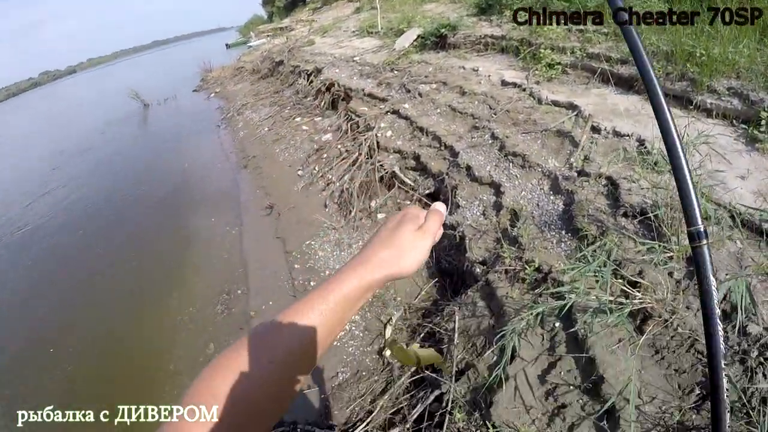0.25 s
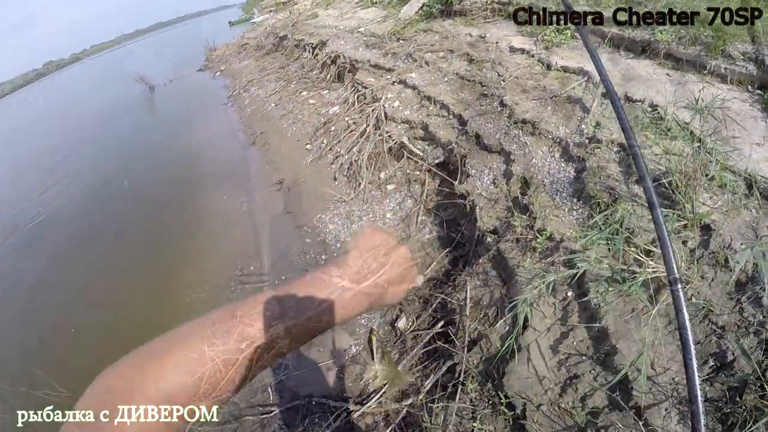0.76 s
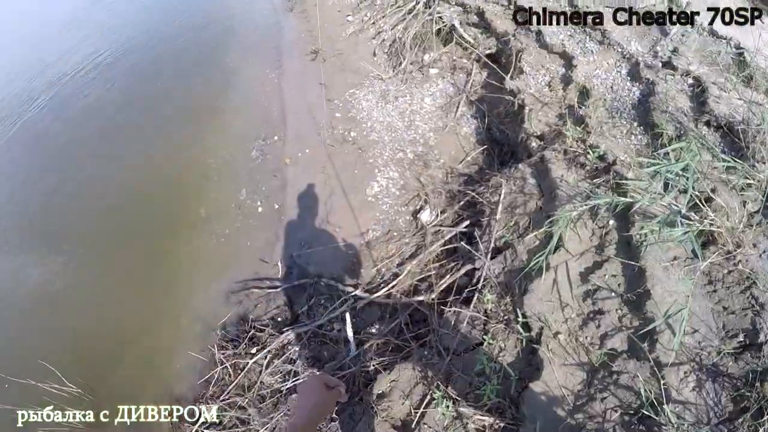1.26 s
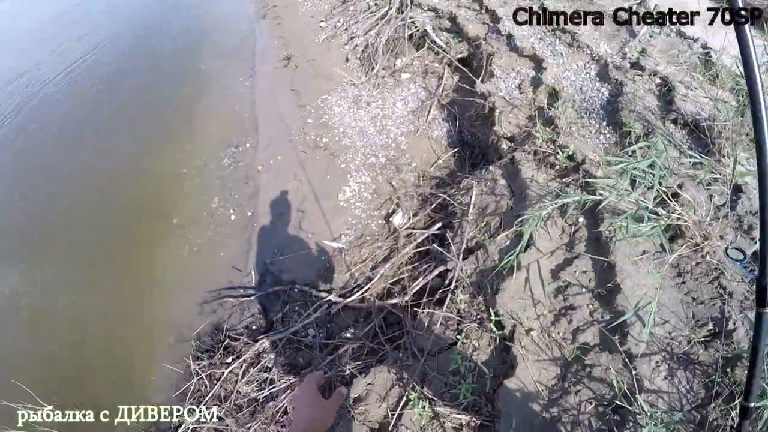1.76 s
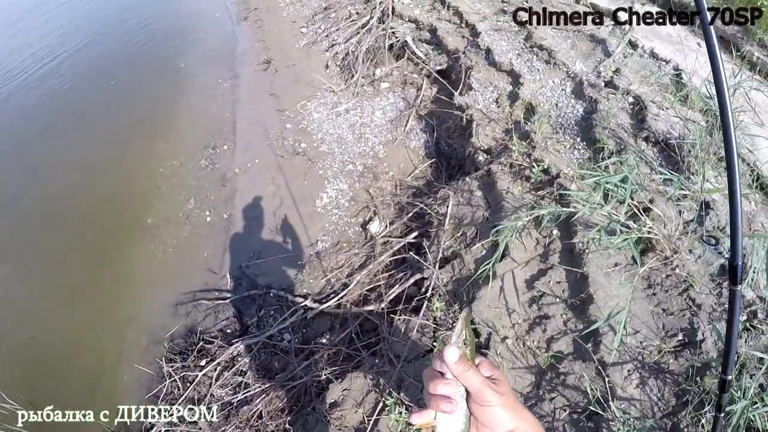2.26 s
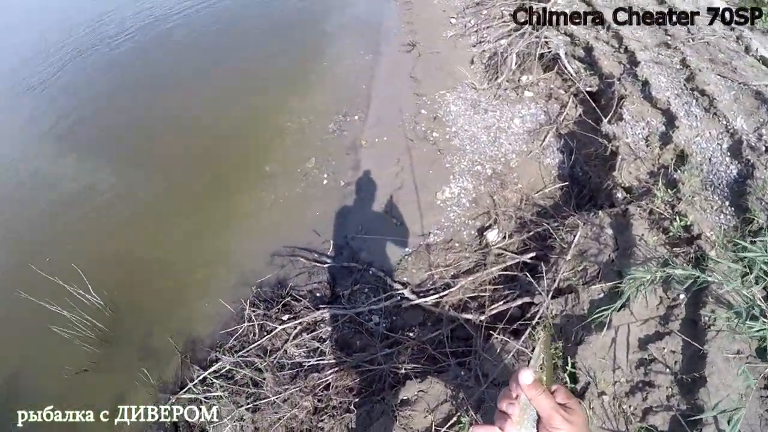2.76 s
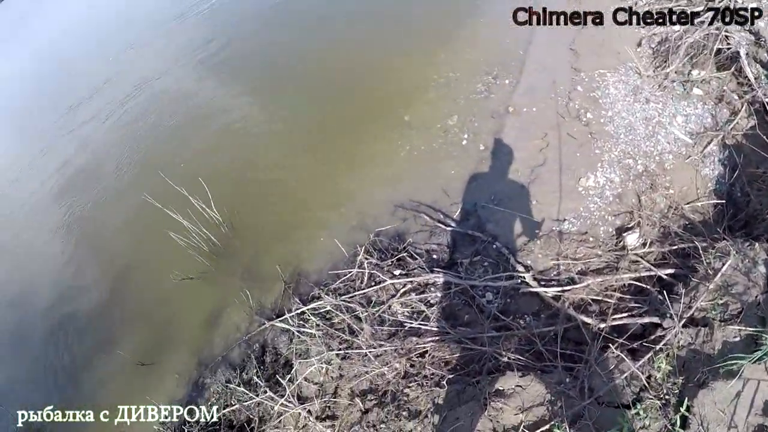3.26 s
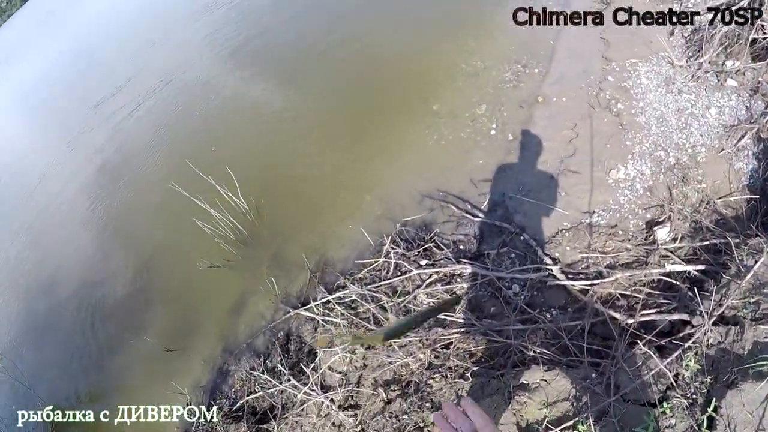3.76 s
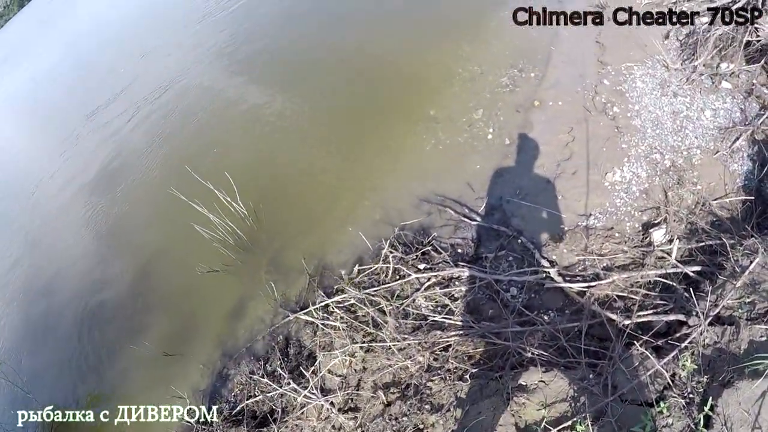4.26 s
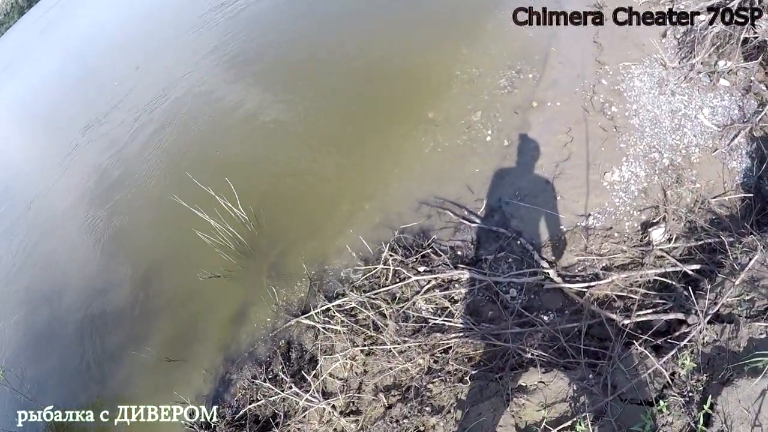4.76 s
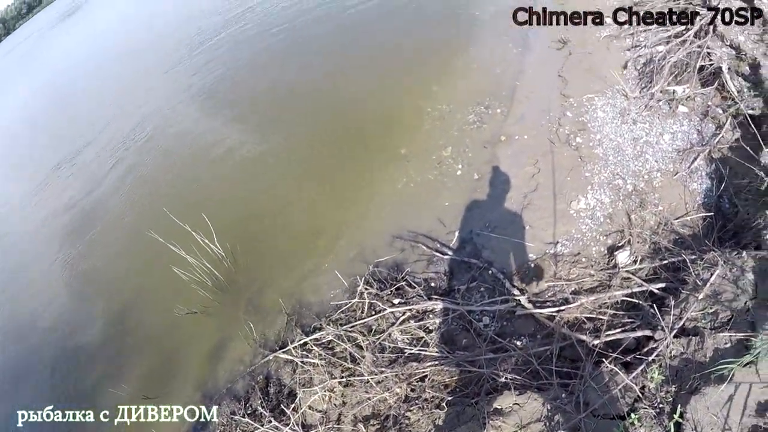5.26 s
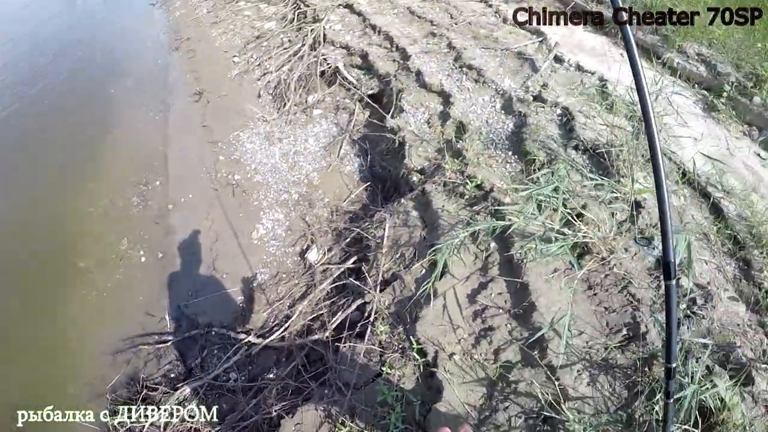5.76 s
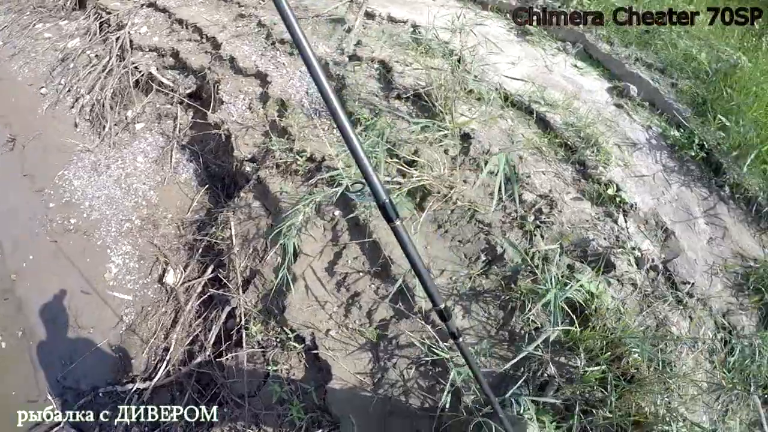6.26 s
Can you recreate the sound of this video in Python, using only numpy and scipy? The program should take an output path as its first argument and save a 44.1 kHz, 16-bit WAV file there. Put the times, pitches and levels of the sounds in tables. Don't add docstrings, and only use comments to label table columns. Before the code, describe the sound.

Brief wet slaps and hard clicks open a breezy riverbank, followed by overlapping cricket buzzes, a light fish splash with droplets, and soft knocks.

```python
import sys
import numpy as np
from scipy import signal
from scipy.fft import rfft, irfft, next_fast_len
from scipy.io import wavfile

SR = 44100
rng = np.random.default_rng(int(sys.argv[2]) if len(sys.argv) > 2 else 0)


def invert_db(level):
    return 10 ** (np.asarray(level, dtype=float) / 20)


def dump(signal):
    limited = np.clip(np.atleast_2d(signal).T, -1, 1)
    pcm = np.round(limited * 32767).astype(np.int16)
    wavfile.write(sys.argv[1], SR, pcm)


N = 286684


def in_time(rows):
    s, *columns = np.transpose(rows)
    return [np.interp(np.arange(N) / SR, s, c) for c in columns]


def rms_one(x):
    return x / np.sqrt(np.mean(x ** 2) + 1e-20)


def drift(rate_hz):
    r = np.exp(-40 * np.pi * rate_hz / SR)
    noise = rng.standard_normal(N // 20 + 2002)
    slow = signal.lfilter([1], [1, -2 * r, r * r], noise)[2000:]
    return np.interp(np.arange(N) / 20, np.arange(len(slow)), rms_one(slow))


def coloured(x, spectrum):
    hz, level_db = np.transpose(spectrum)
    size = next_fast_len(N)
    log_hz = np.log(np.arange(size // 2 + 1) * SR / size + 1e-3)
    gain = invert_db(np.interp(log_hz, np.log(hz), level_db))
    return rms_one(irfft(rfft(x, size) * gain, size)[:N])


def butter_sos(order, hz, kind):
    return signal.butter(order, hz, kind, fs=SR, output="sos")


def pings(events, attack, decay, rise, blunt):
    out = np.zeros(N + SR)
    for (s, peak_db, hz, ms), turn in zip(events, rng.random((len(events), 1))):
        u = np.arange(int(SR * ms / 200) + 8) / (SR * ms / 1000)
        fall = np.exp(-decay * np.maximum(u - attack, 0) ** blunt)
        shape = np.minimum(u / attack, 1) * fall
        pitch_hz = np.minimum(hz * (1 + rise * (u - .5)), .45 * SR)
        cycles = np.cumsum(pitch_hz) / SR + turn
        at = round(s * SR)
        out[at:at + len(u)] += invert_db(peak_db) * shape * np.sin(2 * np.pi * cycles)
    return out[:N]


def ringing(events, cycles):
    return [(s, db, hz, 1000 * cycles / hz) for s, db, hz in events]


# time in seconds, rumble in dB.
GUSTS = [(0.0, -43.5), (0.14, -39), (0.31, -45), (1.38, -45.5), (1.8, -48.5), (2.55, -44.5), (2.62, -39),
         (3.11, -45), (3.82, -48), (4.11, -44), (4.16, -48.5), (4.47, -46.5), (5.0, -47.5), (5.29, -44.5),
         (5.43, -43), (5.77, -46), (6.5, -44.5)]
# frequency in Hz, density in dB per Hz.
RUMBLE_COLOUR = [(8.8, -48), (15, 0.5), (36, -1.5), (97, -9.5), (124, -15.5), (151, -19.5), (308, -29),
                 (400, -47), (520, -61), (880, -120)]
# time in seconds, level in dB.
BREEZE_LEVEL = [(0, -53), (2.6, -53.5), (3.1, -54.5), (4.15, -54.5), (4.47, -53.5), (5.25, -54), (5.5, -52),
                (6.5, -52.5)]
# frequency in Hz, density in dB per Hz.
AIR_COLOUR = [(88, -41), (150, -1.5), (179, -6), (553, -10), (659, -10), (755, -10.5), (848, -12),
              (3450, -16.5), (4530, -16), (5500, -19.5), (9130, -35.5), (10300, -27.5), (15700, -61)]


def wind():
    rustle_db, rustle_s = 8.5, 0.085
    air_db = in_time(BREEZE_LEVEL)[0] + rustle_db * np.exp(-np.arange(N) / SR / rustle_s)
    rumble_db = in_time(GUSTS)[0] + 2.0 + 0.39 * drift(17)
    rumble = coloured(rng.standard_normal(N), RUMBLE_COLOUR) * invert_db(rumble_db)
    air = coloured(rng.standard_normal(N), AIR_COLOUR) * invert_db(air_db + 3.0 + .5 * drift(40))
    leaves = signal.sosfilt(butter_sos(2, 1490, "high"), air)
    brighter = invert_db(air_db - np.median(air_db)) - 1
    return rumble + air + leaves * brighter


# time in seconds, level in dB.
MOTOR_LEVEL = [(0, -65.5), (1.0, -52.5), (1.6, -52.5), (3.2, -53), (4.5, -54.5), (6.5, -60.5)]


def motor():
    hum_hz, width_hz = 123.1, 11
    band = butter_sos(1, [hum_hz - width_hz / 2, hum_hz + width_hz / 2], "band")
    hum = rms_one(signal.sosfilt(band, rng.standard_normal(N)))
    return invert_db(in_time(MOTOR_LEVEL)[0]) * hum


# frequency in Hz, density in dB per Hz.
CHORUS_COLOUR = [(6500, -11), (8500, 0), (10500, -11), (12500, -7.5), (14500, -10), (15900, 1.5)]


def chorus():
    return invert_db(-60 + 2.5 * drift(2.1)) * coloured(rng.standard_normal(N), CHORUS_COLOUR)


# start in seconds, peak in dB, pitch in Hz, overtone in dB above it.
LURE_CLACKS = [(.0014, -20, 5900, -16), (.0058, -24, 8860, -5), (.008, -23, 6000, -20),
               (0.012, -26, 6100, 0), (.017, -18, 6540, -17), (0.02, -27, 5420, -20),
               (0.022, -27, 7280, -20), (0.025, -18, 6880, -20), (0.0275, -22, 8830, -20),
               (0.03, -34, 5200, 11), (.0316, -22, 8080, -20), (.0346, -26, 6800, 4),
               (0.043, -30, 8150, -20), (0.049, -29, 7380, -20), (0.0527, -17, 6900, -2),
               (0.1181, -17.5, 5650, 2), (0.145, -22, 5870, 6.5), (0.1656, -15.5, 5400, -7),
               (.1673, -32, 5800, -9), (0.171, -18, 13060, -25), (.1759, -34, 6960, -22),
               (0.2386, -23, 5700, -6), (0.241, -29, 5730, -20), (0.242, -22, 13700, -20),
               (0.2455, -18.5, 5630, -2), (0.2474, -22.5, 5240, -1), (0.266, -24, 12500, -22),
               (.3285, -31, 8560, -13)]
# start in seconds, peak in dB.
BEAD_TICKS = [(.3213, -34), (.3534, -38.5), (.3718, -43), (.392, -35), (0.4066, -40), (0.441, -34),
              (.4814, -44), (.5022, -38)]


def lure():
    cycles, overtone = 3.4, 1.9
    tick_hz, tick_ms, sag_hz_per_s = 6900, 1.5, 2200
    clacks = ringing([(s, db, hz) for s, db, hz, _ in LURE_CLACKS], cycles)
    clacks += ringing([(s, db + up_db, overtone * hz) for s, db, hz, up_db in LURE_CLACKS], cycles)
    first_s = BEAD_TICKS[0][0]
    ticks = [(s, db, tick_hz - sag_hz_per_s * (s - first_s), tick_ms) for s, db in BEAD_TICKS]
    return clacks + ticks


# frequency in Hz, density in dB per Hz.
SPRAY_SPECTRA = [
    [(470, -56), (800, -9.5), (1250, -9), (1950, -17.5), (2730, -4), (4430, -10), (5610, -5), (14200, -14),
     (15500, -21)],
    [(1000, -4), (1700, -3), (2220, -7), (2630, -2), (4620, -11.5), (5160, -6), (9070, -18.5), (9940, -18),
     (15500, -44)],
]


def spray(events, thrower, level_db, per_s, spread_db, short_s, long_s, long_db, cycles):
    blows = np.zeros(N)
    starts = [round(row[0] * SR) for row in events]
    np.add.at(blows, starts, invert_db(np.array(events)[:, 1]) ** 2)
    burst, patter = [signal.lfilter([1], [1, -np.exp(-1 / (tau * SR))], blows + 1e-18)
                     for tau in (short_s, long_s)]
    sizes = invert_db(spread_db * np.minimum(rng.exponential(1, N), 4)) * rng.choice([-1, 1], N)
    born = rng.random(N) < per_s * invert_db(5.0 * drift(150)) / SR
    pitch_class = rng.integers(0, 16, N)
    rings = 0
    for k, hz in enumerate(np.linspace(30, 120, 16) ** 2):
        r = np.exp(-hz / cycles / SR)
        resonance = [1, -2 * r * np.cos(2 * np.pi * hz / SR), r * r]
        hits = sizes * born * (pitch_class == k) + 1e-18
        rings = rings + rms_one(signal.lfilter([1, 0, -1], resonance, hits)) * hz ** .25
    density = np.sqrt(burst + invert_db(long_db) ** 2 * patter)
    return invert_db(level_db) * density * coloured(rings, SPRAY_SPECTRA[thrower])


# start in seconds, peak in dB, pitch in Hz, length in ms.
SLAPS = [(0.019, -31, 3050, 1.7), (0.0223, -17, 3560, 0.72), (.064, -35, 4200, 1), (0.083, -24, 6660, 0.51),
         (0.0986, -22, 4800, 0.37), (0.1114, -19.5, 2750, 1.2), (0.1165, -35, 3200, 3.5),
         (0.1241, -23.5, 2650, 3.3), (.1248, -28, 5530, 2.3), (0.1381, -21.5, 5600, 0.99),
         (0.1601, -19, 2500, 1), (.162, -33.5, 1430, 5.8), (0.164, -16.5, 3220, 0.75),
         (0.1422, -24, 3800, 0.97), (0.188, -25, 6960, 0.98), (0.196, -32, 6500, 1.6),
         (0.202, -36, 7500, .5), (0.22, -31, 3380, 1.1), (.272, -36, 3550, 3.8), (.2797, -31, 5500, .7),
         (.3045, -43, 3620, 2)]


def fish():
    rattle = lure()
    out = invert_db(6.0) * pings(rattle, attack=0.14, decay=2.2, rise=0.034, blunt=0.84)
    out += invert_db(5.5) * pings(SLAPS, attack=0.34, decay=2.6, rise=0.034, blunt=0.93)
    out += spray(rattle + SLAPS, 0, level_db=-12.5, per_s=3000, spread_db=1.5,
                 short_s=0.0021, long_s=0.02, long_db=-11.0, cycles=1.5)
    return out


# start in seconds, peak in dB, pitch in Hz.
DRY_SNAPS = [(.0037, -20, 7000), (.0059, -11, 7100), (0.0141, -9, 7500), (.0172, -10, 6000),
             (0.0295, -18, 8000), (0.028, -12, 8000), (0.031, -13, 8000), (0.0443, -13, 8000),
             (.0489, -20, 8000), (0.052, -23, 6000), (.1456, -11, 6000), (0.248, -17, 4500),
             (0.242, -25, 4500), (.0875, -17, 7000), (.1023, -27, 5000), (.119, -26, 8000),
             (0.15, -25, 6000), (.1812, -25, 6000), (0.194, -25, 7000), (.1966, -22, 7000),
             (.2021, -22, 7000), (.211, -29, 6000), (.2165, -30, 5500), (0.224, -22, 8000),
             (0.2447, -18, 7000), (.2552, -27, 6000), (0.2682, -21, 8000), (.2847, -38, 6000),
             (.2906, -33, 6000), (0.299, -19, 8000), (.3046, -24, 7000), (4.259, -22, 5000),
             (4.2885, -38, 10000), (4.2965, -41, 6500), (4.3124, -35, 9000), (4.382, -40, 9000),
             (4.4285, -33, 11000), (4.464, -41, 10000), (4.7538, -26, 7000)]


def snaps():
    return invert_db(1.5) * pings(ringing(DRY_SNAPS, 1.04), attack=0.55, decay=4.5, rise=.01, blunt=0.93)


def cricket(phrase, rates, singer, wing, perch, swell, colour, rings, core):
    rasp = 0.17
    start, end, offset = phrase
    glide_1, glide_2, stroke_ms, late_ms = singer
    first_hz, third_hz = wing
    echo_db, echo_ms, scatter_db, scrape_db = perch
    full_db, open_db, after_s, width_s, sag_db = swell
    wing_hz, sharper, second_db, soft_db, third_db = colour
    long_1, long_2, long_3, climb = rings

    t = np.arange(round(start * SR), min(round(end * SR), N)) / SR
    rate = np.interp(t, [start, (start + end) / 2, end], rates)
    strokes = (np.cumsum(rate) - rate.sum()) / SR - offset
    since = strokes % 1 / rate
    u = since * 1000 / stroke_ms
    index = (np.floor(strokes) - np.floor(strokes[0])).astype(int)
    chance = rng.standard_normal((80, 9))[index].T

    swelling = t - start - after_s
    soft = 1 / (1 + np.exp(swelling / width_s))
    level_db = full_db - open_db * soft - sag_db * np.maximum(swelling, 0)
    level_db = level_db - 10 * np.exp((start - t) / 0.057)
    effort = invert_db(0.45 * (level_db - level_db.max()))
    hz = wing_hz * (1 + sharper * soft + climb * swelling)
    mean_hz = np.sqrt(hz * hz[-1])

    lag_s = np.arange(int(.06 * SR)) / SR
    leaves = rng.standard_normal((3, len(lag_s))) * np.exp(-lag_s / 0.022)
    leaves = invert_db(scatter_db) * leaves * np.sqrt(2 / 0.019 / SR)

    partials = [
        (first_hz / mean_hz, glide_1, 0, 0, long_1, 0.05, -7),
        (2, glide_2, second_db + soft_db * soft, 0, long_2, 0.12, .0),
        (third_hz / mean_hz, .02, third_db + 3 * soft, late_ms / stroke_ms, long_3, .1, -1)]
    heard = 0
    for k, (ratio, glide, above_db, late, long, rise, dull_db) in enumerate(partials):
        v = np.maximum(u - late, 0)
        shape = rms_one((1 - np.exp(-v / rise)) * np.exp(-(v / long) ** 3))
        step = np.log(np.cosh(6 * (u / long - .55))) * long * stroke_ms / 12000
        cycles = ratio * hz * (since + glide * effort * (step + (k == 0) * since / 2))
        jitter = rasp * ratio * chance[3 + k]
        tone = np.sqrt(2) * np.sin(2 * np.pi * (cycles + jitter))
        if k == 1:
            teeth = signal.sosfilt(butter_sos(2, 1290, "low"), rng.standard_normal(len(t)))
            tone = tone * (1 + invert_db(scrape_db) * rms_one(teeth))
        tone = shape * tone
        if k < 2:
            ring_hz = core[2 * k] * (hz / hz[-1]) ** ((k + 1) / 2)
            fade = rms_one((1 - np.exp(-since / 0.0017)) * np.exp(-since / 0.0045))
            ring = np.sqrt(2) * np.sin(2 * np.pi * (ring_hz * since + jitter))
            tone = tone + invert_db(core[2 * k + 1]) * fade * ring
        tone = invert_db(level_db - 2.5 + above_db + 0.53 * chance[k]) * tone
        path = np.zeros(len(lag_s))
        path[0] = 1
        path[round(echo_ms * SR / 1000)] = invert_db(echo_db + dull_db)
        swaying = signal.fftconvolve(chance[6:] * tone, invert_db(dull_db) * leaves, axes=1)
        heard = heard + signal.fftconvolve(tone, path) + swaying.sum(axis=0)
    out = np.zeros(N + SR)
    out[round(start * SR):][:len(heard)] = heard
    return out[:N]


# start in seconds, end in seconds, stroke offset 0-1.
SONGS = [(0.34, 0.862, 0.875), (0.9, 1.5, 0.9), (0.86, 1.53, 0.875), (1.56, 2.29, 0.725),
         (2.3, 3.03, 0.925), (2.9, 3.355, 0.175), (3.3, 4.11, 0.4), (4.69, 5.53, 0.575),
         (5.25, 6.075, 0.075), (6.17, 6.5, 0.775)]
STROKE_RATES = [(73.0, 71.2, 67.4), (66.2, 66.4, 70.6), (72.8, 70.45, 68.3), (60.6, 65.1, 62.1),
                (65.5, 67.6, 65.1), (63.8, 72.3, 66.4), (73.7, 76.6, 73.6), (71.2, 71.2, 69.6),
                (62.7, 65.3, 61.0), (61.7, 65.9, 67.3)]
# glide share of 1st partial, of 2nd, stroke in ms, lateness of 3rd in ms.
STROKES = [(0.19, 0.14, 3, 2.0), (0.056, 0.13, 2.6, .3), (0.12, 0.17, 4.7, 1.0), (0.11, 0.067, 3.1, .3),
           (0.05, 0.1, 3, 0.27), (0.043, 0.077, 3.1, 2.2), (0.17, 0.096, 4.6, 2.6), (0.022, 0.19, 5.1, .5),
           (0.03, 0.079, 3.5, .3), (0.045, 0.054, 5.5, .3)]
# 1st in Hz, 3rd in Hz.
RESONANCES = [(5000, 13400), (4560, 14000), (4850, 13300), (4620, 14000), (4720, 13750), (4870, 12750),
              (4420, 13330), (4780, 14300), (4680, 13800), (4650, 14000)]
# ground echo in dB, echo delay in ms, leaf scatter in dB, dry scrape in dB.
PLACES = [(-5, 5.8, -7, -3.5), (-13, 13, -1, 2.5), (-12, 23, 0.5, 1), (-13, 2.5, -7.5, -10),
          (-10.5, 7, -7.5, -4), (-10, 7.8, -7, -1.5), (-9, 4.6, -10, -7.5), (-4, 5.6, -3.5, -0.7),
          (-25, 5.2, -8.5, -7), (-30, 15, -6, -2)]
# full level in dB, opening in dB below it, swell time in seconds,
# swell width in seconds, sag in dB per second.
SWELLS = [(-52.5, 20, 0.078, 0.023, 4.5), (-55, 3, 0.099, 0.042, 9.5), (-56, 6.5, .07, 0.028, 14),
          (-48.5, 18.5, .31, 0.068, 4), (-48, 11, 0.28, 0.065, 8.5), (-54.5, 7, 0.065, 0.054, 4),
          (-48, 9.5, 0.34, 0.024, -0.5), (-55, 15, 0.26, 0.072, 7.5), (-48.5, 17.5, 0.25, 0.041, -0.5),
          (-47.5, 13, 0.26, 0.048, 2)]
# wing pitch in Hz, opening sharpness as a share, 2nd partial in dB above 1st,
# its gain when soft in dB, 3rd in dB above 1st.
COLOURS = [(4930, 0.052, -1, 16, -27), (4800, -0.0078, -3.5, -1, -18), (4840, -.02, -6.5, 10, -20),
           (4610, -0.05, -3, 8.5, -18), (4546, 0.026, -1.8, 3, -13), (4880, -0.024, 1, 5, -10),
           (4554, 0.025, -1.6, 4, -18), (4950, .01, -2.5, 7.5, -22), (4550, -0.011, -3.5, 9, -17.5),
           (4550, 0.046, -3.5, 4.5, -27)]
RING_LENGTHS = [(1.1, 0.78, .4, 0.001), (0.73, 0.89, .4, -0.016), (0.8, 0.83, .4, -0.029),
                (1.02, .8, .4, 0.011), (1.6, .8, .3, 0.082), (1.05, 0.64, .35, -0.036),
                (0.76, 0.59, .8, 0.001), (0.72, 0.77, .3, -0.116), (1.16, 1, .5, 0.0085),
                (1, .7, .4, 0.001)]
# 1st pitch at the end in Hz, its level in dB re stroke, 2nd in Hz, its level in dB.
FREE_RINGS = [(5050, -6, 10000, -13), (4650, -11, 9200, -10), (4850, -14, 8900, -16),
              (4690, -8, 9150, -7.5), (4730, -6, 9350, -4.5), (4950, -6, 9750, -5), (4670, -6.5, 9000, -5),
              (4770, -9, 11000, -18), (4850, -12, 9150, -5.5), (4650, -9, 9100, -8)]


def crickets():
    songs = zip(SONGS, STROKE_RATES, STROKES, RESONANCES, PLACES, SWELLS, COLOURS, RING_LENGTHS, FREE_RINGS)
    return sum(cricket(*song) for song in songs)


# start in seconds, peak in dB, pitch in Hz, length in ms.
DULL_KNOCKS = [(2.62, -32.5, 79, 38), (3.272, -35.5, 447, 1.5), (3.515, -40, 248, 11),
               (3.515, -40, 654, 3.7), (4.258, -34.5, 297, 4.4), (4.572, -37.5, 1320, 5.3),
               (4.664, -39, 800, 2.4), (4.97, -41.5, 725, 12), (5.065, -44, 3200, 4),
               (1.178, -37, 6400, .5), (2.232, -42, 11300, 1.5), (2.37, -41, 11200, .6),
               (2.99, -45, 11600, 1.5), (5.575, -40, 10700, .8), (6.014, -32.5, 523, 4.2),
               (6.02, -27.5, 613, 1), (6.022, -32, 220, 8.7)]


def knocks():
    return pings(DULL_KNOCKS, attack=0.053, decay=1.06, rise=0.012, blunt=0.82)


# start in seconds, peak in dB, pitch in Hz, length in ms.
SPLASH_BUBBLES = [(4.2507, -31, 2140, 0.9), (4.2539, -28, 2120, 5.1), (4.2575, -29.5, 1020, 1.5),
                  (4.2583, -30, 2920, 2.2), (4.3329, -43, 3540, 2.2), (4.3962, -34, 1040, 5.5),
                  (4.4037, -37, 2920, 3.4), (4.4047, -32, 885, 4.6), (4.4798, -34.5, 2870, 4.5),
                  (4.7209, -41, 2000, 5.6), (4.7449, -31.5, 5050, 2), (4.7502, -43, 2730, 1.4),
                  (4.8015, -38, 2330, 0.92), (4.8629, -46, 1840, 2.7), (4.8656, -46, 3330, 3),
                  (4.8722, -29, 3150, 1.8), (4.9255, -39, 2100, 1.3), (4.9284, -40, 910, 6.2),
                  (4.9384, -35.5, 990, 1.9), (4.9566, -43, 2540, 4), (4.9569, -33, 1490, 1.2),
                  (4.9595, -40, 1710, 9.4), (4.9677, -38.5, 1530, 2.1), (4.9794, -34, 2820, 2.4)]
# start in seconds, peak in dB, pitch in Hz.
SURFACE_DROPS = [(4.254, -26.5, 4400), (4.258, -29, 4860), (4.2602, -22, 5240), (4.2617, -40, 6170),
                 (4.2882, -37, 4130), (4.3495, -41, 5500), (4.369, -38, 3180), (4.3962, -47, 4010),
                 (4.4075, -33, 3420), (4.426, -32.5, 4600), (4.4283, -33, 5600), (4.4454, -36, 3610),
                 (4.4918, -32.5, 7650), (4.611, -42, 5200), (4.614, -33, 5730), (4.623, -42, 1750),
                 (4.678, -45, 5900), (4.333, -37, 9700), (4.3355, -40, 9900), (4.4508, -36, 9100),
                 (4.4949, -37, 7500), (4.5, -40, 9000), (4.482, -42, 5600), (4.453, -45, 3400),
                 (4.606, -42, 5600), (4.624, -43, 3100), (4.666, -44, 3600), (4.376, -39, 3300),
                 (4.3575, -46, 3400), (4.341, -44, 5600), (4.805, -39, 5500), (4.406, -38.5, 8100),
                 (4.7181, -42, 3700), (4.7202, -33, 4900), (4.746, -39, 8920), (4.7503, -28, 5400),
                 (4.7546, -36, 3420), (4.821, -40, 4800), (4.961, -34, 4550), (4.9794, -33, 5400),
                 (4.9854, -31, 5000), (4.9923, -40, 4950), (5.012, -49, 1900), (4.922, -41, 1730),
                 (4.954, -43, 2020)]


def splash():
    drops = ringing(SURFACE_DROPS, 4.2)
    out = invert_db(4.0) * pings(SPLASH_BUBBLES, attack=0.21, decay=1.6, rise=0.041, blunt=0.94)
    out += invert_db(3.5) * pings(drops, attack=0.3, decay=2.2, rise=0.048, blunt=1.06)
    out += spray(SPLASH_BUBBLES + drops, 1, level_db=-13.5, per_s=3500, spread_db=4.5,
                 short_s=0.0032, long_s=0.077, long_db=-16.5, cycles=4.3)
    return out


def scene():
    background = wind() + motor() + chorus()
    return (background + fish() + snaps() + crickets() + knocks() + splash())[None]


def roll_off(x):
    return signal.sosfilt(signal.butter(12, 15890, fs=SR, output="sos"), x)


def record(dry):
    low_pass = signal.ellip(6, .5, 32, 15220, fs=SR, output="sos")
    mix = signal.sosfilt(low_pass, dry)
    return roll_off(mix)


dry = scene()
out = record(dry)
dump(out)
```